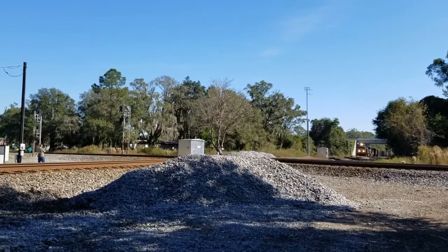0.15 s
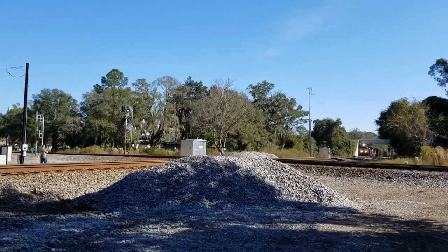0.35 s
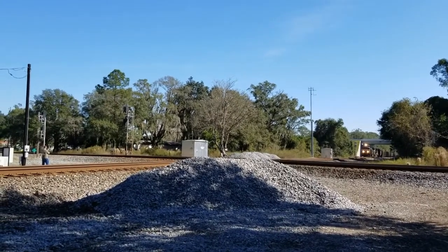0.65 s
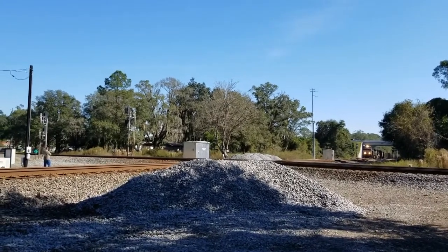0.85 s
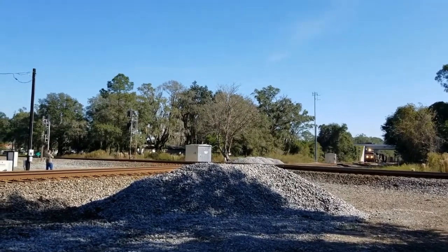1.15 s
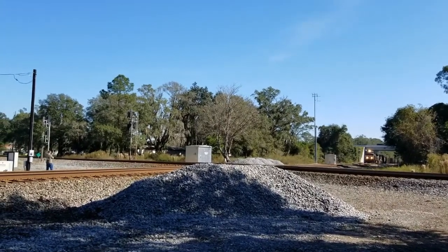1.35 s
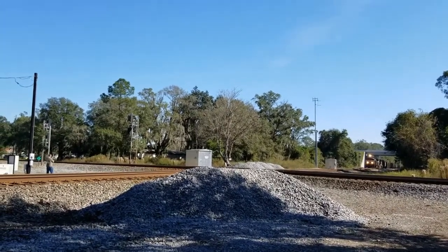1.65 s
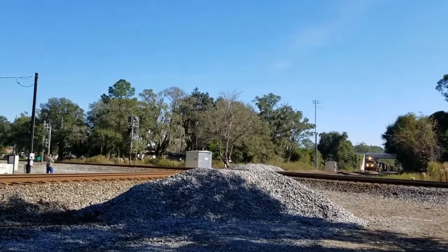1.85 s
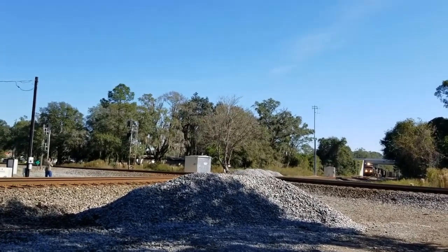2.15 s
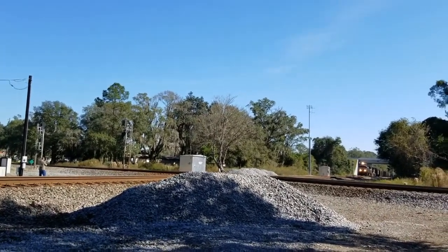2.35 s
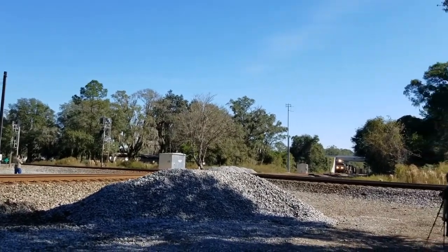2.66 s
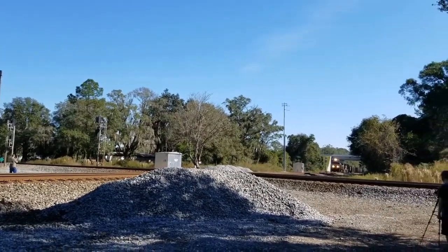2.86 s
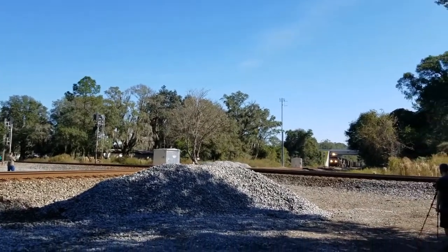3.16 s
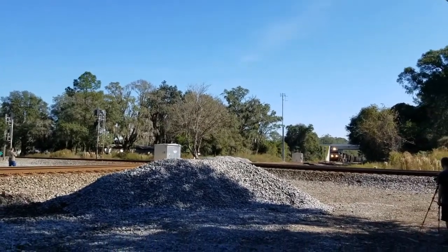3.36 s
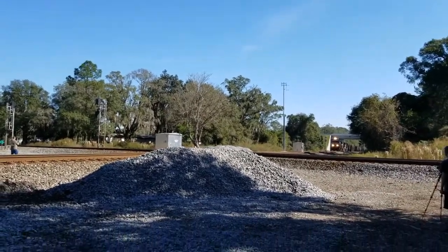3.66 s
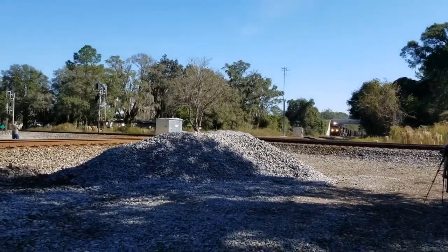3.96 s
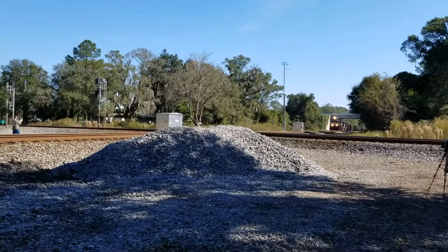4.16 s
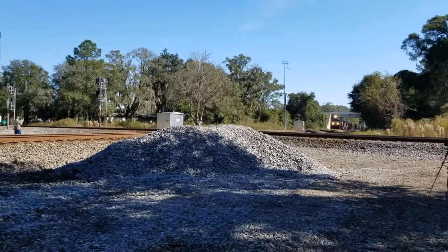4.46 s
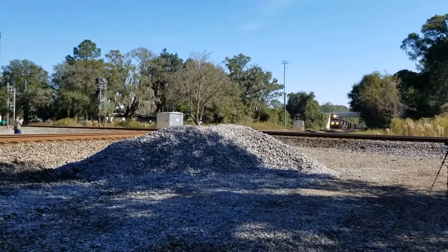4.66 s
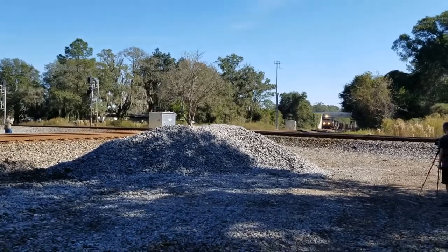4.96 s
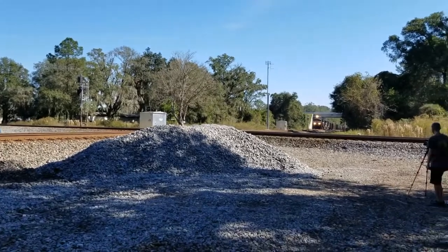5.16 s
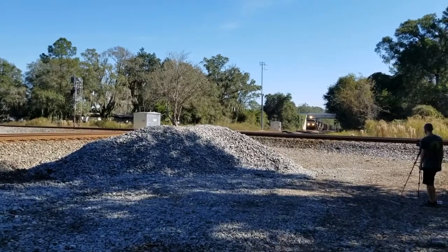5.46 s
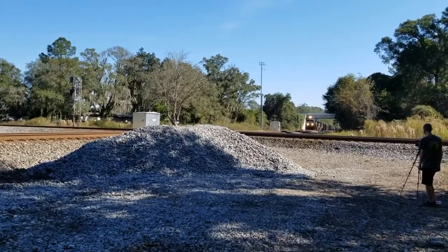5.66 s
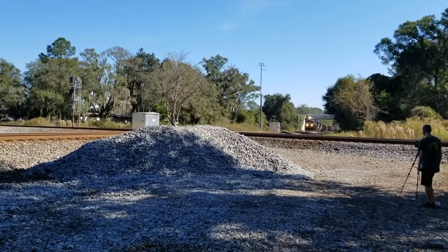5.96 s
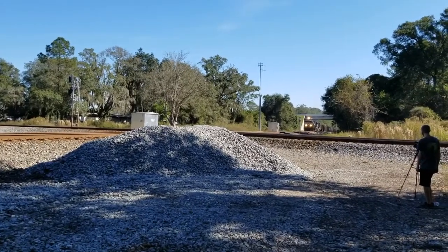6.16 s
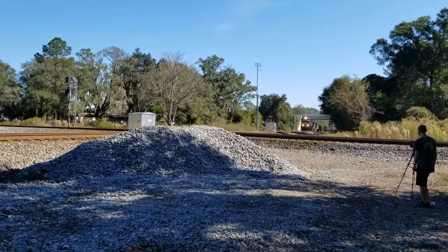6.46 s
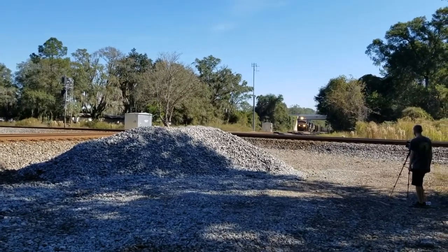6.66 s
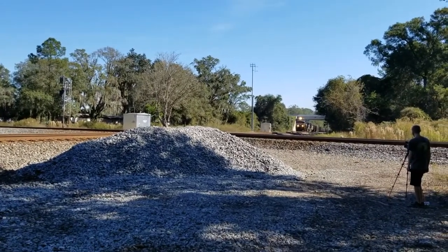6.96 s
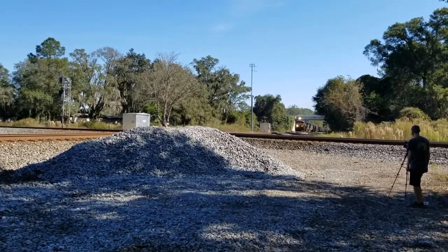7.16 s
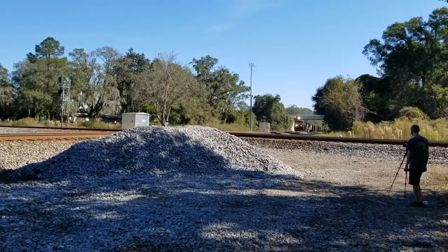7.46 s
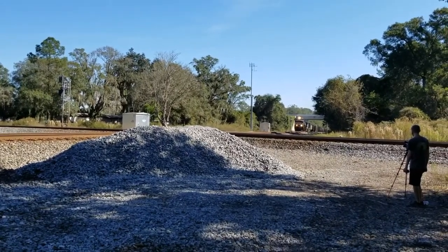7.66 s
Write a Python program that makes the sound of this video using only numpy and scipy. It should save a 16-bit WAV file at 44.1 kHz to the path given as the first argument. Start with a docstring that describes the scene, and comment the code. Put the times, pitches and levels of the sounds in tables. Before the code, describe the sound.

A diesel freight train approaches outdoors, its engines droning low throughout over a soft wash of rolling cars and faintly ringing rails. In the first second and a half, four footsteps crunch on gravel close by, slightly left, with small stone clicks and a thin, distant squeak at about 1.2 seconds. From around 2 seconds the leading engine throttles up, slowly rising in pitch with a throaty throb. A faint clank comes at 3.5 seconds, then two dull knocks at 4 and 4.4. At 4.7 seconds the wheels start hissing against the rails, and they squeal in three swells between 5 and 6.5 seconds. At 6.5 seconds a loud, brassy air horn sounds a chord from the right, echoing among trees. It holds to the end, near 8 seconds, while the other sounds drop beneath it.

```python
"""Open ground by a railway, two closely spaced microphones, a diesel freight drawing near on the right.
At first the engines drone, the rails sing softly and feet crunch gravel close by; a far squeak at 1.2 s.
From 1.9 s the leading engine gathers speed and barks; a short clank and two dull knocks follow. At 4.7 s
flanges start to hiss on the rails, then the wheels squeal. At 6.5 s a five-chime air horn sounds, echoed
by the trees, and the gain control ducks the whole scene under it."""
import sys
import numpy as np
from scipy import signal
from scipy.fft import rfft, irfft
from scipy.io import wavfile
from scipy.ndimage import uniform_filter1d, map_coordinates

SR = 44100
rng = np.random.default_rng(int(sys.argv[2]) if len(sys.argv) > 2 else 0)


def store_pcm(level_fs):
    """Save levels as 16-bit WAV."""
    pcm = np.round(np.clip(level_fs, -1, 1) * 32767).astype(np.int16)
    wavfile.write(sys.argv[1], SR, np.atleast_2d(pcm).T)


N = 344862
TIME, BINS = np.arange(N) / SR, np.fft.rfftfreq(N, 1 / SR)
SIDES = np.array([[.5], [-.5]])  # left microphone, right microphone
HORN_S = 6.532


def blast(valve_s=0.029, pressure_s=0.1, swell_db_per_s=4.5):
    """The horn valve opens: gives gain in dB, treble dB at 3 kHz and the share of pressure lacking."""
    age = since(HORN_S)
    shut = np.maximum(1 - age / valve_s, 0)
    slack = np.exp(-age / pressure_s)
    level_db = 5.5 + swell_db_per_s * age - 27 * shut ** 2
    treble_db = 2 - 17 * slack - 20 * shut
    return level_db, treble_db, slack


# The horn's bells: pitch f/Hz, then relative level/dB of partials 1-10
HORN_BELLS = [(270.45, -26, -42, -29, -30, -32, -47.5, -35.5, -38.5, -45, -41),
              (321.2, -30.5, -28, -31, -35, -43, -38.5, -45.5, -49.5, -45, -57.5),
              (376.1, -27.5, -23.5, -44, -44, -38, -46, -40.5, -58, -45.5, -56),
              (486, -36.5, -27.5, -39.5, -32.5, -43.5, -42.5, -48.5, -72, -56, -67),
              (519.6, -37, -42, -42, -43, -50, -60, -56, -52.5, -64, -62)]
# Their brassy partials above the tenth: f/Hz, relative level/dB
HORN_OVERTONES = [(2850, -50), (3100, -57), (3430, -50), (3900, -63), (4300, -57.5), (4750, -68),
                  (5200, -66.5), (6300, -77.5), (8500, -85), (11000, -99)]
def horn(drift=0.00074, rattle=0.00397, start_sharp=0.027, slow_db_per_hz=0.0208):
    """Diaphragms chop air into five bells: sharp, rough and dull at first, in tune as pressure builds."""
    on = TIME > HORN_S
    level_db, treble_db, slack = (curve[on] for curve in blast())
    chord, brass = np.zeros((2, N))
    for pitch_hz, *partials_db in HORN_BELLS:
        flutter = 1 + drift * wander(rate_hz=8.5)[on]
        flutter += rattle * (1 + 0.97 * slack) * wander(rate_hz=95)[on]
        turns = np.cumsum(pitch_hz * (1 + start_sharp * slack) * flutter) / SR
        # the higher bells stand out while the pressure builds
        bell_db = level_db + slow_db_per_hz * (pitch_hz - HORN_BELLS[0][0]) * slack
        for k in range(1, int(HORN_OVERTONES[-1][0] / pitch_hz)):
            hz = k * pitch_hz
            db = partials_db[k - 1] if k <= len(partials_db) else read(HORN_OVERTONES, hz)
            gain = amp(db + bell_db + treble_db * hz / 3000)
            part = chord if hz < 1400 else brass
            part[on] += np.sqrt(2) * gain * np.sin(2 * np.pi * (k * turns + rng.random()))
    return steepen(chord) + brass  # the low partials carry nearly all the pressure


def steepen(x, lead_s=0.000056):
    """In very loud sound crests outrun troughs, adding a rasp of sum and difference tones."""
    return map_coordinates(x, [np.arange(N) + lead_s * SR * x], order=3, mode="mirror")


# Air rushing through the bells: f/Hz, relative level/dB
AIR_SPECTRUM = [(200, -21), (300, -8), (440, -22), (600, -5), (850, 0), (1100, 7.5), (1350, -3.5),
                (1900, -2.5), (2800, -1), (3500, -1.5), (4200, -13), (5100, -14.5), (6500, -29),
                (8600, -28.5), (11000, -43), (15800, -56)]
def air_rush(build_s=0.18):
    """Diffuse hiss of the air that drives the horn, building more slowly than the chord."""
    build = 1 - np.exp(-since(HORN_S) / build_s)
    return build * amp(blast()[0] - 28.5) * noise(amp(read(AIR_SPECTRUM, BINS)))


# Echoes, shifted in pitch because the horn moves: delay t/s, pitch factor, level/dB
HORN_ECHOES = [(.045, 0.91, -30), (.11, .9895, -15.5), (.17, 1.009, -42)]
# Reverberation among the trees: f/Hz, t/s to fall 60 dB
TREE_DECAY = [(250, 1.4), (1000, 2.2), (4000, 2.3), (10000, 0.33)]
def among_trees(x, bass_db=-16, treble_db=-3, crossover_hz=1800):
    """The horn reaches the microphones direct, as echoes, and as mostly treble scatter off the trees."""
    heard = amp(-1.5) * from_right(x)
    for delay, shift, db in HORN_ECHOES:
        mic_lag = rng.uniform(-0.00046, 0.00022) * SIDES  # each echo has its own direction
        heard += amp(db) * np.interp(HORN_S + (TIME - delay - HORN_S + mic_lag) * shift, TIME, x)
    hz, t, white = signal.stft(rng.standard_normal((2, SR)), SR, nperseg=256)
    decay = amp(-60 * t / read(TREE_DECAY, hz)[:, None])
    tail = rfft(signal.istft(white * decay, SR, nperseg=256)[1], SR)
    tail /= np.sqrt(np.mean(abs(tail[:, 300:3000]) ** 2))  # unit gain over 300-3000 Hz
    bass = 1 / (1 + (np.fft.rfftfreq(SR, 1 / SR) / crossover_hz) ** 4)
    tail = diffuse(tail * (amp(bass_db) * bass + amp(treble_db) * (1 - bass)), size=SR)
    return heard + signal.fftconvolve(x[None], tail, axes=1)[:, :N]


# Lines from the leading diesel's unequal cylinders: {multiple of crankshaft speed: relative level/dB}
CRANK_ORDERS = {6: -23, 8: -24, 9: -8, 10: -24, 11: -12, 12: 0, 13: -22, 14: -16, 15: -10, 17: -18, 20: -22,
                21: -20, 24: -18}
# Its exhaust bark: f/Hz, relative level/dB
BARK_SPECTRUM = [(90, -18), (110, -2), (145, -3.5), (200, 0.5), (240, -12), (330, -16.5), (450, -40)]
# The trailing engine at steady speed: f/Hz, level/dB
TRAILING_DRONE = [(41.6, -53.5), (52.3, -61), (91.8, -35), (107, -49)]
# Dull rumble under both: f/Hz, relative level/dB
RUMBLE_SPECTRUM = [(10, -30), (24, -13), (38, 8.5), (55, 12), (80, 6), (115, -5.5), (200, -3), (300, -11.5),
                   (450, -49.5)]
def engines(cylinders=12, firing_hz=70.1, rise_hz=11.5, throttle_s=1.9, speed_up_s=3.25):
    """The leading diesel is throttled up once and barks as it takes load; the trailing one drones."""
    gained_hz = rise_hz * (1 - np.exp(-(since(throttle_s) / speed_up_s) ** 2))
    crank_hz = (firing_hz + gained_hz) / cylinders
    unloaded = 1 - 1 / (1 + np.exp((1.96 - TIME) / 0.41))  # half load at 1.96 s
    body = sum(amp(db) * tone(k * crank_hz, waver=0.18) for k, db in CRANK_ORDERS.items())
    bark = sum(amp(read(BARK_SPECTRUM, k * crank_hz)) * tone(k * crank_hz, waver=0.67)
               for k in range(16, 56))
    drone = sum(amp(db) * tone(hz, waver=0.21) for hz, db in TRAILING_DRONE)
    rumble = amp(-36) * noise(amp(read(RUMBLE_SPECTRUM, BINS)))
    boom = amp(-25.5 - 0.56 * gained_hz) * body  # weakens as the firing leaves the exhaust resonance
    return amp(-3 * unloaded) * (boom + rumble) + amp(-39.5 - 9 * unloaded) * unit(bark) + drone


# Wheel flanges rubbing the rail: f/Hz, relative level/dB
FLANGE_SPECTRUM = [(700, -19), (1400, -6), (2000, 1.5), (3300, -2), (4200, -2), (4550, -8), (5000, -5.5),
                   (6200, -19), (7600, -26), (8600, -19), (9800, -27), (11000, -36), (15800, -50)]
def flanges(start_s=4.725, attack_s=0.11, bite_s=0.28, nearing_db_per_s=1.87):
    """Flanges bite the rail, then rub louder as they near: part direct from the right, part scattered."""
    colour, age = amp(read(FLANGE_SPECTRUM, BINS)), since(start_s)
    direct = from_right(noise(colour)[0])
    hiss = unit(noise(colour) + 1.1 * direct)
    level_db = -43.3 + nearing_db_per_s * age + 9.5 * np.exp(-(age / bite_s) ** 2)
    return np.minimum(age / attack_s, 1) * amp(level_db + .5 * wander(rate_hz=2.9)) * hiss


# Modes of a rubbed wheel: f/Hz, width f/Hz, level/dB
WHEEL_MODES = [(850, 8.6, -49.5), (1574, 25, -55.5), (1814, 44, -42), (3970, 27, -50.5), (5750, 55, -63.5),
               (8320, 90, -76)]
# Squeals, each darker than the last: peak t/s, half length t/s, relative level/dB, tilt/(dB per octave)
SQUEAL_SWELLS = [(5.06, .14, -8.5, 8), (5.39, .125, .5, 1.5), (6.22, .32, 1.2, -1)]
def wheel_squeal(pivot_hz=1815, uneven_db=0.7):
    """Each swell of friction rings all the modes of a wheel, unevenly."""
    squeal = np.zeros((2, N))
    for hz, width_hz, mode_db in WHEEL_MODES:
        octaves = np.log2(hz / pivot_hz)
        friction = sum(amp(db + tilt * octaves) * swell(s, half) for s, half, db, tilt in SQUEAL_SWELLS)
        squeal += friction * amp(mode_db + uneven_db * wander(rate_hz=5.6)) * ringing(hz, width_hz)
    return squeal


# Feet shifting on gravel: t/s, level/dB, thud f/Hz
FOOTSTEPS = [(.243, -38, 420), (.684, -36, 750), (1.23, -29, 480), (1.528, -23.5, 290)]
def gravel():
    """Close to the microphones, a little left, each step is a dull thud and a crunch."""
    thuds = sum(burst(s, db, hz, t60=0.03, octaves=1.3, pan_db=3.5, dull_hz=2500)
                for s, db, hz in FOOTSTEPS)
    crunches = sum(burst(s, db - 13.5, centre_hz=450, t60=0.25, octaves=2.4, pan_db=6.5)
                   for s, db, _ in FOOTSTEPS)
    return diffuse(rfft(thuds + crunches), size=N)


# Clicks, a tick, a clank and knocks: t/s, level/dB, centre f/Hz, t/s to fall 60 dB
SHORT_HITS = [(.431, -42.5, 3800, .02), (.574, -36, 4300, .011), (.776, -49, 12000, .012),
              (1.161, -24.5, 2500, .011), (3.455, -38, 1500, .18), (4.011, -30, 1250, .023),
              (4.404, -35.5, 1100, .046)]
def clicks_and_knocks():
    """Near stone clicks and a faint, very high tick; later a clank and two knocks, maybe far couplers."""
    hits = sum(burst(s, db, hz, t60, octaves=0.65, pan_db=0.5, dull_hz=2 * hz)
               for s, db, hz, t60 in SHORT_HITS)
    return diffuse(rfft(hits), size=N)


def burst(s, db, centre_hz, t60, octaves, pan_db, grain_db=2.5, dull_hz=11000):
    """A short, grainy band of noise that starts at s seconds and dies away."""
    track, t = np.zeros((2, N)), np.arange(SR // 4) / SR
    hz = np.fft.rfftfreq(len(t), 1 / SR) + 1
    grains = rng.standard_normal((2, len(t))) * amp(grain_db * rng.exponential(1, len(t)))
    colour = (1 + (np.log2(hz / centre_hz) / octaves) ** 2) ** -1.5 / np.hypot(1, hz / dull_hz)
    grit = unit(irfft(rfft(grains) * colour, len(t)))
    track[:, round(s * SR):][:, :len(t)] = grit * amp(db + pan_db * SIDES - 60 * t / t60)
    return track


# Rolling cars and cooling fans, far down the line: f/Hz, relative level/dB
ROLLING_SPECTRUM = [(180, -30), (300, -2), (454, -11.5), (825, -5.5), (1250, -10), (1710, -7), (2270, -9),
                    (2680, -12.5), (3110, -11.5), (4190, -20.5), (4950, -19.5), (6780, -34.5), (8550, -39),
                    (10600, -52), (15800, -48)]
def rolling_cars(nearing_db_per_s=0.606, split_hz=2000):
    """The train's wash grows as it nears; moving air sways its lower and upper parts separately."""
    wash = noise(amp(read(ROLLING_SPECTRUM, BINS)))
    top = irfft(rfft(wash) * BINS ** 2 / (BINS ** 2 + split_hz ** 2), N)
    swayed = (wash - top) * amp(0.18 * wander(rate_hz=21)) + top * amp(wander(rate_hz=17))
    return amp(-44.5 + nearing_db_per_s * TIME) * swayed


# Notes in the rails: peak t/s, half length t/s, f/Hz, width f/Hz, level/dB
RAIL_SONG = [(.3, 1.5, 646, 131, -50), (2, 2.1, 7300, 90, -78.5), (2.4, 0.46, 795, 80, -52),
             (3, 1, 5000, 400, -60), (3.403, 0.76, 3170, 180, -52), (4.806, 1.5, 1040, 111, -55.5)]
def singing_rails():
    """The steel rings ahead of the train in broad, soft, overlapping notes."""
    return sum(amp(db) * swell(s, half) * ringing(hz, width) for s, half, hz, width, db in RAIL_SONG)


def distant_squeak(start_s=1.19, rise_s=0.18, fade_db_per_s=30, flutter_db=3):
    """One thin, far-off line swells, flutters and fades, sinking a little in pitch."""
    age = since(start_s)
    hz = 3790 + 70 * np.exp(-age / .22)
    level_db = -45 - fade_db_per_s * since(start_s + rise_s) + flutter_db * wander(rate_hz=23)
    gain = np.minimum(age / rise_s, 1) ** 2 * amp(level_db)
    return gain * np.array([tone(hz * (1 + 0.007 * wander(rate_hz=87)), waver=.1) for _ in range(2)])


def from_right(x, lag_s=.00116, above_hz=1350):
    """A source on the right: the bass alike at both microphones, the treble late on the left."""
    hz = np.fft.rfftfreq(2 * N, 1 / SR)
    bass = 1 / (1 + (hz / above_hz) ** 40)
    left = irfft(rfft(x, 2 * N) * (bass + (1 - bass) * np.exp(-2j * np.pi * hz * lag_s)))
    return np.array([left[:N], x])


# Diffuse sound at the microphone pair: f/Hz, left-right correlation
MIC_COHERENCE = [(130, 0.98), (290, 0.97), (640, 0.8), (1400, 0.019), (3000, 0.16), (8000, -0.11),
                 (15000, 0.13)]
def diffuse(spectra, size):
    """Two unrelated spectra become channels alike in the bass, as at two close microphones."""
    a, b = spectra
    same = read(MIC_COHERENCE, np.fft.rfftfreq(size, 1 / SR))
    return irfft(np.array([a, same * a + np.sqrt(1 - same ** 2) * b]), size)


def noise(gain):
    """Diffuse stereo noise of rms 1, shaped by a gain for each frequency."""
    a, b = rng.standard_normal((2, 2, len(BINS)))
    return unit(diffuse((a + 1j * b) * gain, size=N))


def ringing(hz, width_hz):
    """One steel resonance excited by friction."""
    return noise(1 / (1 + ((BINS - hz) / width_hz) ** 2))


def tone(hz, waver):
    """A sine on a pitch curve, wavering in strength."""
    turns = np.cumsum(hz * np.ones(N)) / SR + rng.random()
    return np.sqrt(2) * np.sin(2 * np.pi * turns) * (1 + waver * wander(rate_hz=3.35))


def wander(rate_hz):
    """A smooth random curve of rms 1, moving at up to about the given rate."""
    hz = BINS[:4000]
    a, b = rng.standard_normal((2, len(hz)))
    return unit(irfft((a + 1j * b) * (hz > 0) / (1 + (hz / rate_hz) ** 4), N))


def swell(peak_s, half_s):
    """A smooth, flat-topped rise and fall."""
    return np.exp(-.5 * ((TIME - peak_s) / half_s) ** 4)


def since(s):
    """Seconds gone since a moment, zero before it."""
    return np.maximum(TIME - s, 0)


def read(points, hz):
    """Interpolates a table on a log-frequency axis."""
    f, value = np.transpose(points)
    return np.interp(np.log(hz + 1), np.log(f), value)


def amp(db):
    """Decibels to gain."""
    return 10 ** (np.asarray(db) / 20)


def unit(x):
    """Scales to rms 1."""
    return x / np.sqrt(np.mean(x ** 2) + 1e-20)


# Left microphone over right: f/Hz, level/dB
MIC_BALANCE = [(100, 0.4), (300, 0), (600, 3), (1100, 4.5), (2000, -0.5), (4000, 1.5), (8000, -2),
               (12000, -4)]
# Left microphone ahead of right: f/Hz, phase/rad
MIC_PHASE = [(200, -0.14), (800, -0.28), (1100, 0.19), (2000, -0.78), (4000, -0.12), (8000, -0.88)]
def scene():
    """Everything heard at the trackside, coloured a little differently at each microphone."""
    mix = engines() + rolling_cars() + flanges() + singing_rails() + wheel_squeal() + distant_squeak()
    mix += gravel() + clicks_and_knocks() + among_trees(horn()) + air_rush()
    mix *= signal.windows.tukey(N, .0015)
    hz = np.fft.rfftfreq(2 * N, 1 / SR)
    mics = amp(read(MIC_BALANCE, hz) * SIDES) * np.exp(1j * read(MIC_PHASE, hz) * SIDES)
    return irfft(rfft(mix, 2 * N) * mics)[:, :N]


def record(dry, threshold_db=-20, squeeze=0.83, settle_s=0.32, edge_hz=15850):
    """A slow gain control turns everything down under the loud horn; a low-pass limits the band."""
    power_db = 10 * np.log10(abs(uniform_filter1d((dry ** 2).mean(0), size=2000)) + 1e-12)
    hold = np.exp(-1 / (settle_s * SR))
    duck_db = signal.lfilter([1 - hold], [1, -hold], squeeze * np.maximum(power_db - threshold_db, 0))
    low_pass = signal.firwin(511, edge_hz, window=("kaiser", 9), fs=SR)
    return signal.oaconvolve(dry * amp(-duck_db), low_pass[None], "same")


dry = scene()
out = record(dry)
store_pcm(out)
```